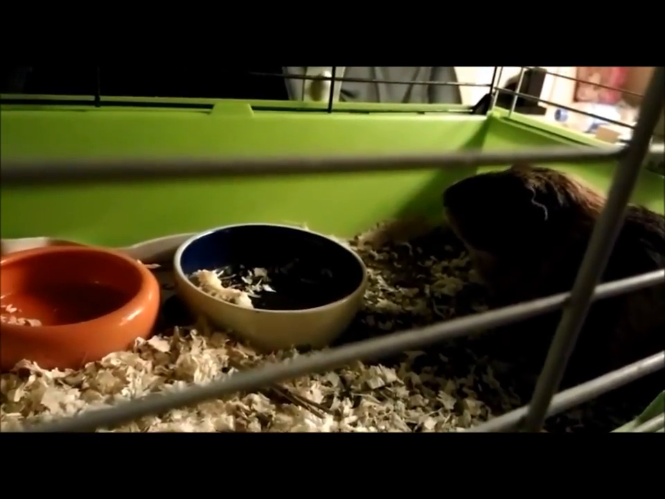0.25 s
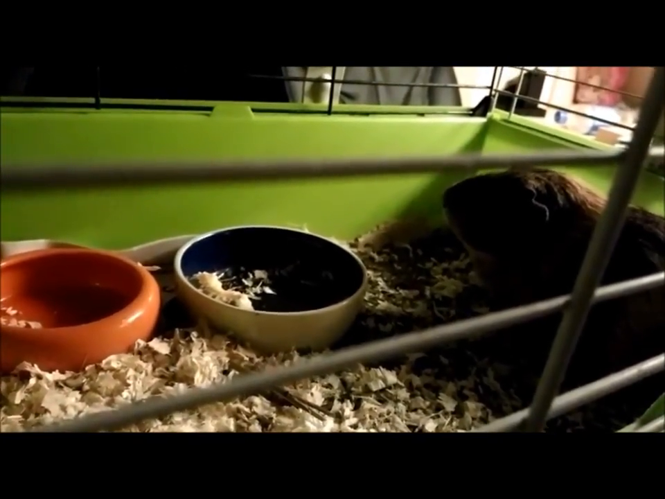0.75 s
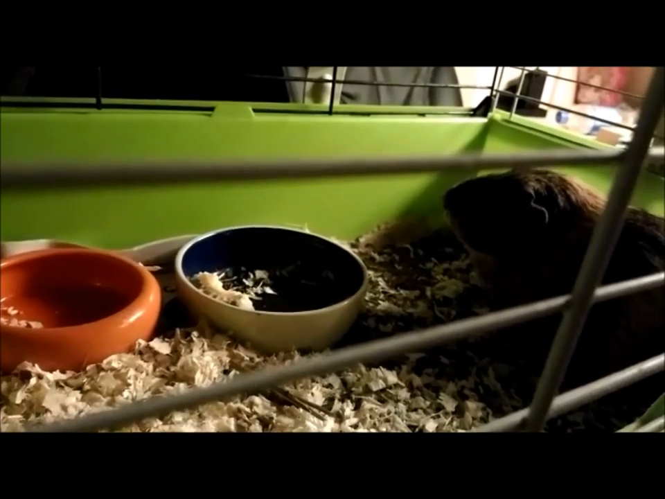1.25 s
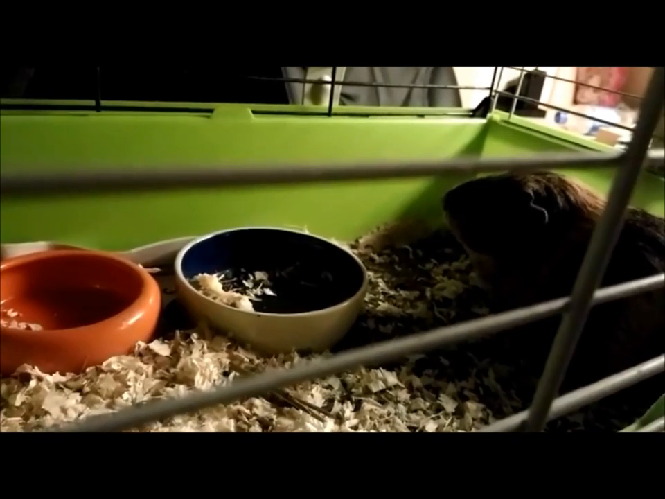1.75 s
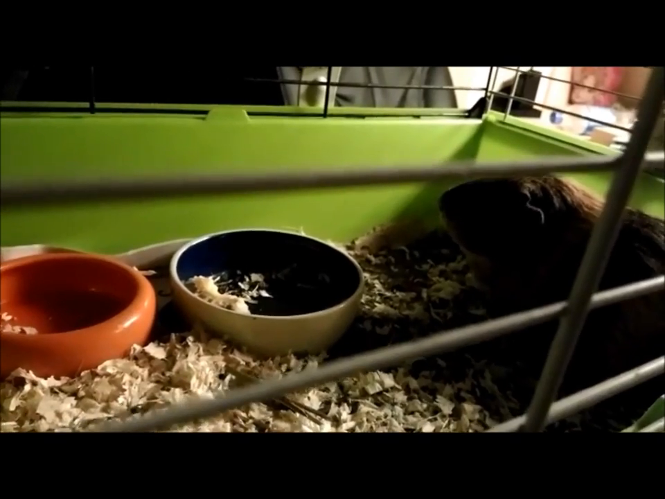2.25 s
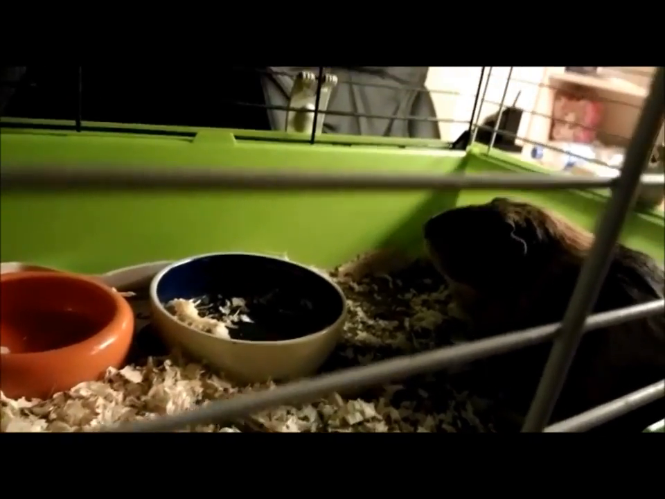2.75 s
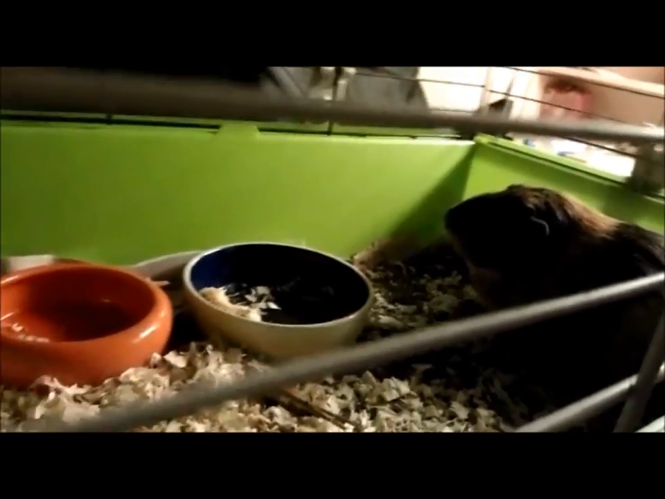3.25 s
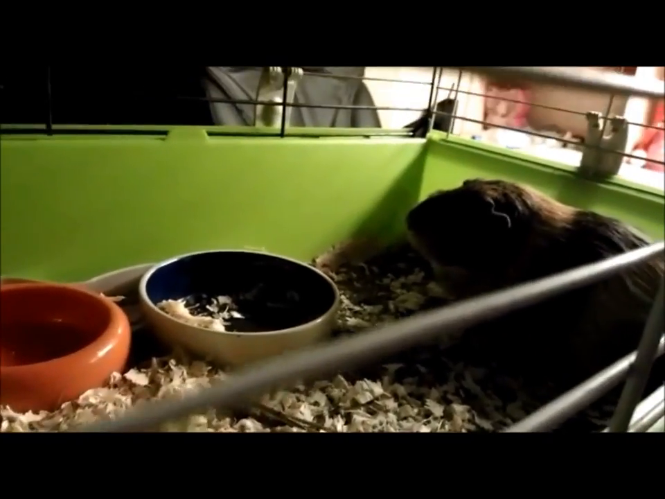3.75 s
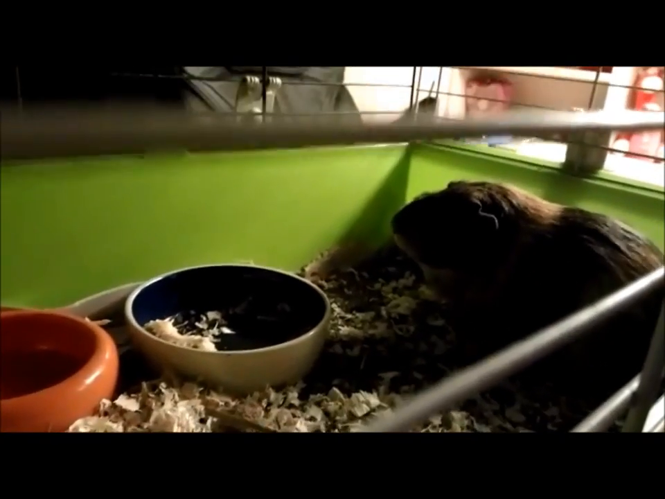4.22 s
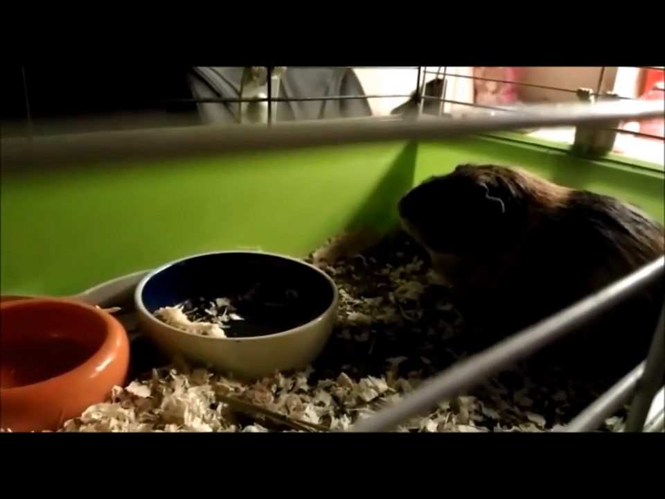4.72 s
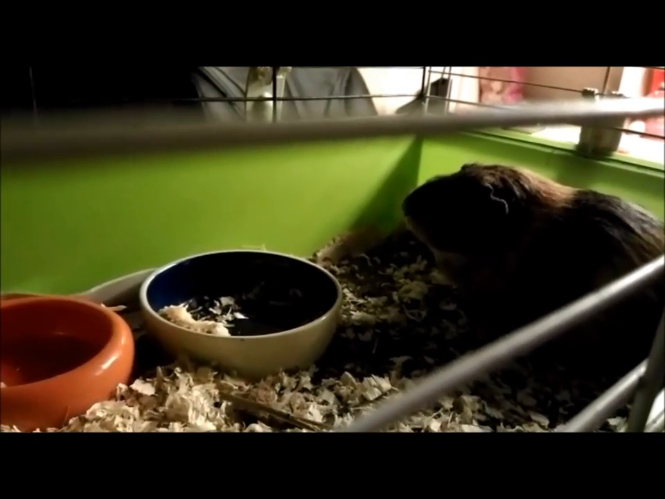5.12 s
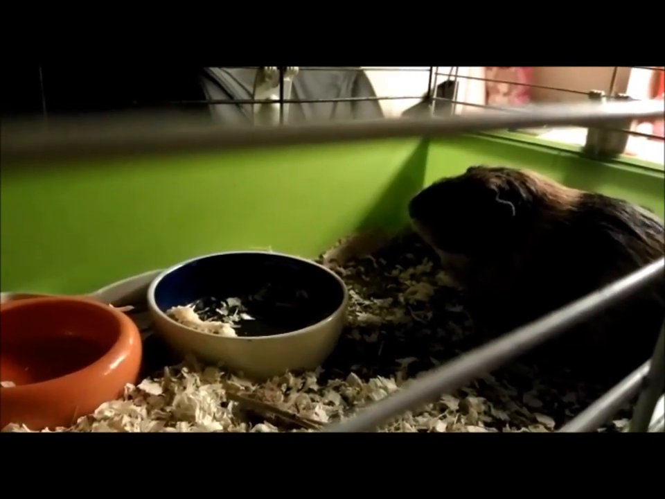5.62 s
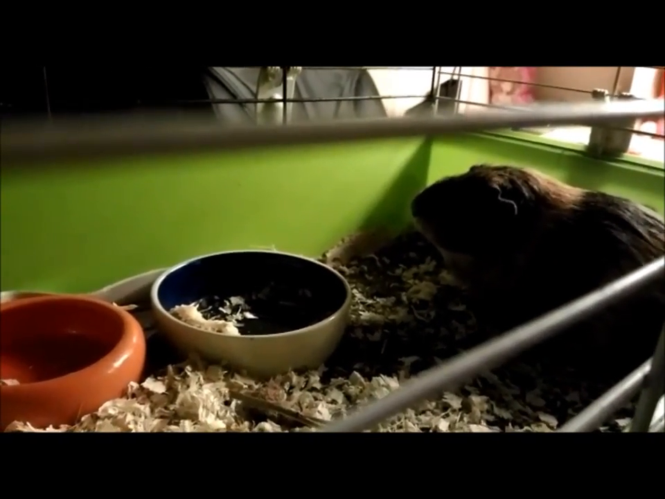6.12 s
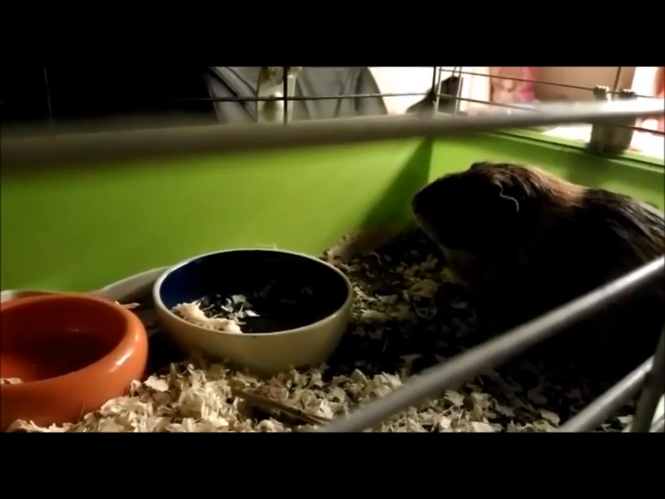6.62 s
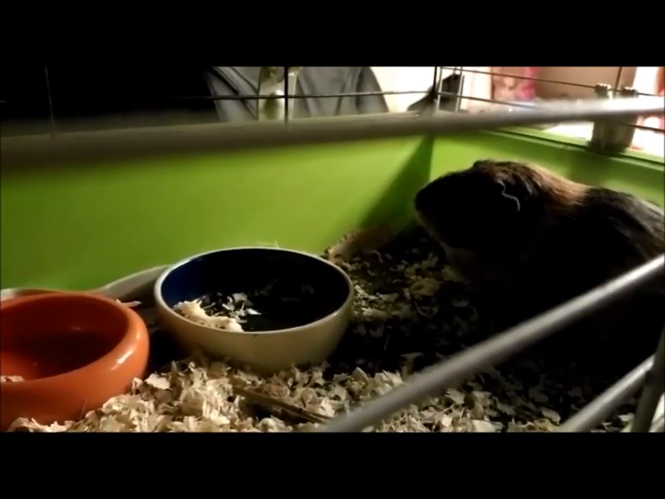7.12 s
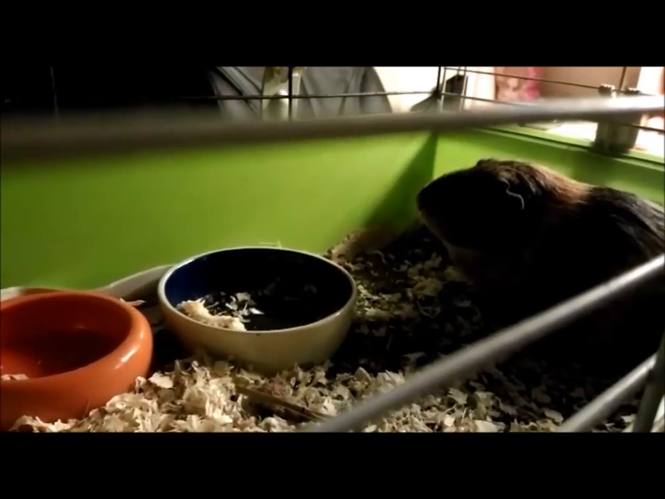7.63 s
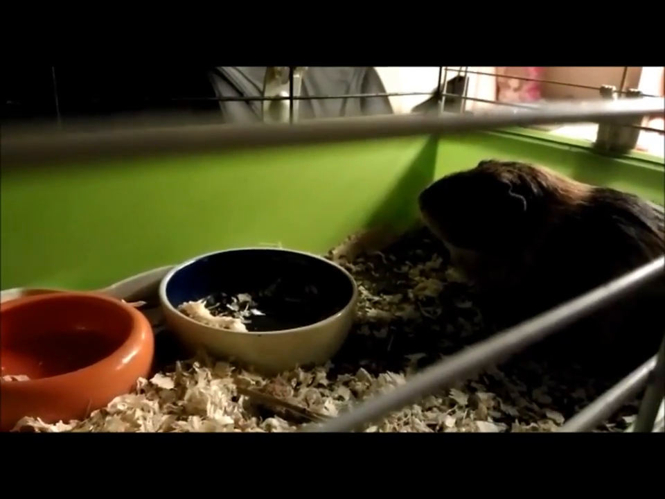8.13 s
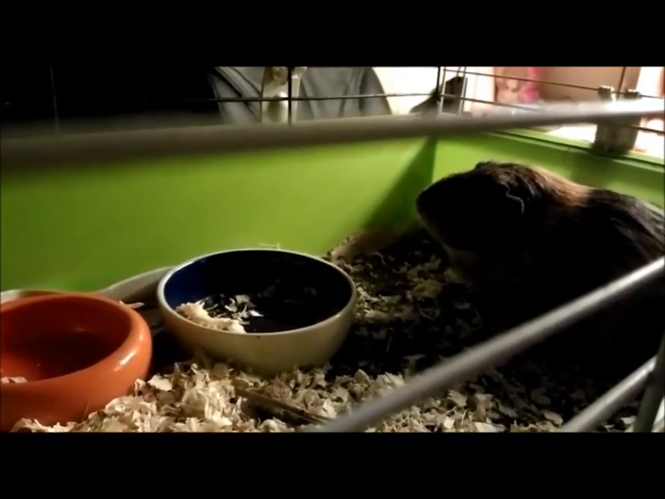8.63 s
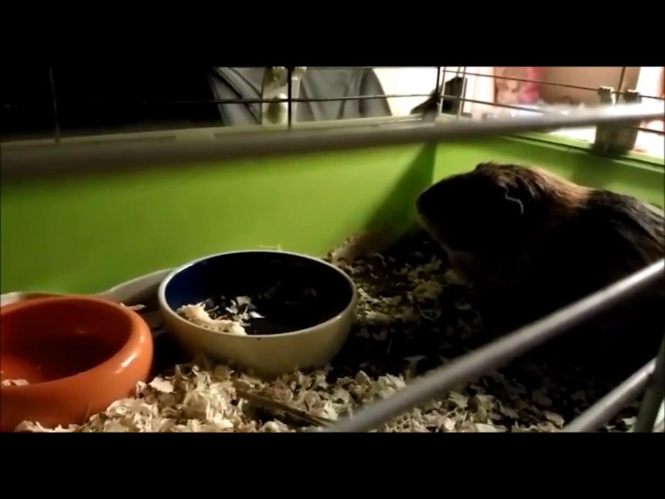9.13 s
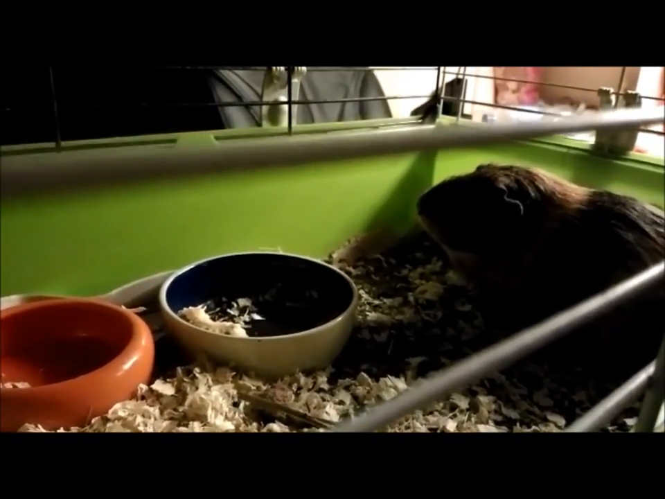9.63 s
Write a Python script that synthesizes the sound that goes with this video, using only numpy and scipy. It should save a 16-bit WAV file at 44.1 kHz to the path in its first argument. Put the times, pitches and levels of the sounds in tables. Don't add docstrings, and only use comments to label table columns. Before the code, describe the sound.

Close indoor sound of one small pet squeaking in two long, regular runs. The squeaks are very short, high and bright, dropping in pitch, with a short ringing reflection from cage and walls. Between runs come crisp cracks, light rustling, faint sniffs and broken calls. The second run is quieter, with one odd rising, cracking squeak. Low hush, a weak uneven hum and soft handling thumps lie underneath.

```python
import sys
import numpy as np
from scipy import signal
from scipy.fft import rfft, irfft, next_fast_len
from scipy.io import wavfile
from scipy.ndimage import uniform_filter1d, map_coordinates

SR = 44100
rng = np.random.default_rng(int(sys.argv[2]) if len(sys.argv) > 2 else 0)


def master(y):
    cut = np.clip(np.atleast_2d(y).T, -1, 1)
    pcm = np.round(cut * 32767)
    wavfile.write(sys.argv[1], SR, pcm.astype(np.int16))


def how_loud(loudness_db):
    steps = np.asarray(loudness_db, float) / 20
    return 10 ** steps


N = 435266

# start_s, length_s, top_pitch_hz, last_pitch_hz, level_db
FIRST_RUN = [(-0.022, 0.055, 3640, 2980, -32), (0.209, 0.05, 3580, 2897, -30),
             (0.431, 0.054, 3596, 2890, -30.5), (0.663, 0.055, 3603, 3080, -31.5),
             (0.889, 0.055, 3584, 2924, -30.5), (1.129, 0.053, 3608, 2884, -30),
             (1.339, 0.057, 3581, 2970, -29.5), (1.586, 0.051, 3562, 2940, -29.5),
             (1.799, 0.061, 3543, 2733, -29.0), (2.06, 0.055, 3610, 2974, -31.5),
             (2.258, 0.063, 3603, 2940, -30.5), (2.491, 0.056, 3565, 2907, -30.5),
             (2.709, 0.058, 3592, 2926, -30.0), (2.924, 0.053, 3618, 3130, -32)]
SECOND_RUN = [(4.845, 0.052, 3736, 2937, -37), (5.045, 0.06, 3729, 2880, -34.0),
              (5.287, 0.062, 3698, 2860, -35), (5.497, 0.061, 3734, 2876, -34.5),
              (5.744, 0.052, 3704, 2923, -35.5), (5.955, 0.06, 3690, 2880, -33.5),
              (6.447, 0.052, 3700, 2860, -34), (6.66, 0.057, 3652, 3106, -34),
              (6.899, 0.053, 3617, 2663, -33), (7.107, 0.06, 3619, 2990, -34.0),
              (7.339, 0.059, 3623, 2784, -33.5), (7.543, 0.062, 3635, 2896, -32.5),
              (7.802, 0.056, 3627, 2820, -34), (8.001, 0.06, 3610, 2986, -33.5),
              (8.291, 0.058, 3600, 2814, -33.5), (8.515, 0.061, 3554, 2880, -33),
              (8.762, 0.057, 3635, 2876, -34.5), (8.959, 0.058, 3627, 3077, -33),
              (9.252, 0.051, 3634, 2770, -33), (9.449, 0.058, 3604, 2960, -30.5),
              (9.709, 0.056, 3623, 2925, -33.5)]
# freq_hz, level_db
HISS = [(4600, -27.5), (5300, -21.5), (7000, -14.5), (8200, -15), (9500, 3), (10600, -9.5), (12300, -4),
        (14000, -21)]


def unit(x):
    return x / np.sqrt(np.mean(x ** 2) + 1e-20)


def along(points, hz):
    f, v = np.transpose(points)
    return np.interp(np.log(hz + 1), np.log(f + 1), v)


def over_time(points):
    return np.interp(np.arange(N) / SR, *np.transpose(points))


def filtered(x, response):
    m = next_fast_len(len(x) + 8192)
    return irfft(rfft(x, m) * response(np.fft.rfftfreq(m, 1 / SR)), m)[:len(x)]


def coloured(x, spectrum):
    return filtered(x, lambda hz: how_loud(along(spectrum, hz)))


def noise(spectrum, size=N):
    return unit(coloured(rng.standard_normal(size), spectrum))


def wobble(rate, size=N):
    return map_coordinates(rng.standard_normal(int(size * rate / SR) + 4), [np.arange(size) * rate / SR])


def smooth(s, v, t):
    v = np.pad(v, (2, 2), mode="reflect", reflect_type="odd")
    return map_coordinates(v, [np.interp(t, s, np.arange(len(s))) + 2])


def add(track, s, sound):
    at = round(s * SR)
    part = track[max(at, 0):][:len(sound) + min(at, 0)]
    sound = sound[max(-at, 0):]
    part += sound[:len(part)]


def murmur():
    # time_s, level_db
    hush = [(0, -78.5), (1.2, -79), (2.901, -76.5), (3.2, -80.5), (3.499, -77.5), (3.749, -84.5),
            (4.28, -84.5), (4.34, -76.5), (4.6, -76), (4.7, -85.5), (4.879, -80.5), (5.029, -79),
            (9.87, -79)]
    # freq_hz, density_db_per_hz
    low_colour = [(15, -60.5), (25, -24.5), (155, -10.5), (194, -10), (369, -17), (568, -24), (700, -28.5),
                  (910, -53.5), (1540, -120)]
    air_colour = [(290, -19.5), (500, -5.5), (923, -7.5), (1090, -4.5), (1380, -7), (1850, -4.5),
                  (4000, -11.5), (7000, -24)]
    far_colour = [(1500, -20), (3000, -3.5), (7500, -1.5), (12200, 0), (14000, -2.5)]
    level_db = over_time(hush)
    low = how_loud(level_db - 1 + 2.1 * wobble(4.4)) * noise(low_colour)
    air = how_loud(level_db + 3 + 1.3 * wobble(9)) * noise(air_colour)
    return low + air + how_loud(-84) * noise(far_colour)


def drone():
    # time_s, level_db
    swell = [(0, -82.5), (3.5, -92), (4.7, -91), (4.95, -87), (7, -80.5), (9.87, -79.5)]
    hum = noise([(45, -31), (82, -8.5), (130, -22.5), (300, -80.0)])
    return how_loud(over_time(swell) + 1.8 * wobble(8.8)) * hum


def thumps(rise=.006, t60=.075):
    # time_s, peak_db, pitch_hz
    bumps = [(0.059, -65, 130), (0.427, -68, 134), (0.799, -73.5, 94.2), (2.522, -62.5, 114),
             (4.354, -76, 140), (4.569, -79.5, 159.5), (6.088, -69, 141), (6.819, -69, 113),
             (7.069, -76, 169), (7.525, -65.5, 113), (9.336, -70, 162)]
    out, t = np.zeros(N), np.arange(SR // 6) / SR
    for s, db, hz in bumps:
        swell = how_loud(db + 14.5 - 60 * t / t60) * (1 - np.exp(-t / rise))
        add(out, s, swell * np.sin(2 * np.pi * hz * t))
    return out


def ticks(lag=.001, t60=0.0046, clack_t60=0.0093):
    # time_s, treble_peak_db, middle_db, low_knock_db
    hits = [(2.028, -50, -86.5, -88), (2.793, -29, -63, -70), (2.812, -31.5, -57.5, -67),
            (2.8378, -25, -49.5, -44), (2.8996, -18, -39, -45.5), (2.9911, -25, -48.5, -47),
            (3.435, -48, -79, -85), (3.4647, -42.5, -67, -77), (3.49, -32.5, -69.5, -80),
            (3.5718, -50, -72, -70), (3.726, -65.5, -85, -73.5), (3.7991, -69.5, -83.5, -66),
            (3.8676, -57, -77, -76.5), (4.1151, -76.5, -80.5, -70), (4.1411, -63, -85, -79),
            (4.3344, -69, -76, -78.5), (4.3527, -36.5, -59.5, -72), (4.5507, -50.5, -67, -91),
            (4.571, -42.5, -56.5, -72), (4.8434, -42, -61, -83.5)]
    # freq_hz, level_db
    crack_colour = [(5000, -56), (7500, -6), (10500, 7.5), (14000, -15), (15500, 14), (16500, -34)]
    clack_colour = [(200, -0.5), (600, -7.5), (2000, -8.5), (4000, -6.5), (6000, -4), (9000, -13.5)]
    start_hz, end_hz, fall_s, knock_t60 = 300, 120, .01, .05
    cracks, clacks, knocks = np.zeros(N), np.zeros(N), np.zeros(N)
    t = np.arange(SR // 10) / SR
    knock_hz = end_hz + (start_hz - end_hz) * np.exp(-t / fall_s)
    knock = how_loud(-60 * t / knock_t60) * np.sin(2 * np.pi * np.cumsum(knock_hz) / SR)
    for s, db, clack_db, knock_db in hits:
        add(cracks, s + lag, how_loud(db - 0.5 - 60 * t / t60) * rng.standard_normal(len(t)))
        add(clacks, s + lag, how_loud(clack_db + 21.5 - 60 * t / clack_t60) * rng.standard_normal(len(t)))
        add(knocks, s + lag, how_loud(knock_db + 1.5) * knock)
    return coloured(cracks, crack_colour) + coloured(clacks, clack_colour) + knocks


def sniffs():
    # start_s, length_s, level_db
    breaths = [
        (2.761, 0.12, -66),
        (3.41, 0.17, -70),
        (3.53, .12, -71.5),
        (3.774, 0.085, -86.5),
        (4.009, .08, -92),
        (4.12, .12, -84),
        (4.5, .05, -76),
    ]
    flow = np.zeros(N)
    for s, length, db in breaths:
        add(flow, s, how_loud(db) * np.sqrt(np.hanning(round(length * SR))))
    grain = unit(how_loud(4 * wobble(220)))
    return flow * grain * noise([(5000, -22.0), (8000, -10), (10200, 0), (12000, 0.5), (14000, -6)])


def puffs(rise=0.0054, hiss_t60=0.042):
    # freq_hz, level_db
    puff_colour = [(90, -35), (280, 7), (900, -18), (1900, 6.5), (2600, 2.5), (4000, -20.5), (5200, -7.5),
                   (7500, -26.5)]
    # time_s, puff_db, hiss_db
    odd_shuts = [
        (3.3104, -76.5, -51),
        (4.4029, -53.5, -51),
        (4.612, -54, -58),
        (6.278, -54, -52.5),
    ]
    lead_s, puff_t60 = .034, .055
    shut_s, scatter_db = .01, 2.5
    dull, airy, t = np.zeros(N), np.zeros(N), np.arange(SR // 8) / SR
    shuts = []
    for s, length, *_ in FIRST_RUN + SECOND_RUN:
        puff_db, hiss_db = rng.normal((-53, -48.5), scatter_db)
        shuts.append((s + length + shut_s, puff_db, hiss_db))
    for s, puff_db, hiss_db in shuts + odd_shuts:
        add(dull, s - .003, how_loud(puff_db + 4.0 - 60 * t / puff_t60) * (1 - np.exp(-t / rise)))
        fade_db = -60 * np.clip(t - lead_s - .006, 0, 1) / hiss_t60
        add(airy, s - lead_s, how_loud(hiss_db + fade_db) * np.clip(t / lead_s, 0, 1) ** 2)
    return dull * noise(puff_colour) + airy * how_loud(3.5 * wobble(150)) * noise(HISS)


def contours():
    # time_s, pitch_hz, fundamental_db
    odd_calls = [
        [(3.26, 3510, -29), (3.27, 3690, -38), (3.279, 3524, -31.5), (3.288, 3405, -30.5), (3.296, 2940, -20.5),
         (3.305, 2809, -23), (3.314, 2380, -47)],
        [(3.536, 3190, -57), (3.541, 3410, -58.5), (3.547, 3430, -65.5)],
        [(4.356, 3500, -45.5), (4.366, 3503, -36.5), (4.374, 3065, -35), (4.382, 2773, -30.5),
         (4.39, 2643, -33), (4.398, 2590, -30)],
        [(4.577, 3270, -48), (4.584, 3364, -44.5), (4.591, 3250, -46.5), (4.598, 3120, -45.5)],
        [(6.204, 3520, -50.5), (6.219, 3638, -37), (6.232, 3557, -37), (6.246, 3196, -32), (6.259, 2560, -43),
         (6.272, 2405, -34)],
    ]
    peak_s, sag_bend = .014, 1.83
    swell_s, swell_db, fade_db = .03, 9.5, 0.5
    for s, length, top_hz, last_hz, db in FIRST_RUN + SECOND_RUN:
        t = np.arange(0, length, 1 / SR)
        sag = np.abs((t - peak_s) / (length - peak_s)) ** sag_bend
        level_db = db - swell_db * np.clip(1 - t / swell_s, 0, 1) - fade_db * sag
        yield s, t, top_hz - (top_hz - last_hz) * sag, level_db
    for rows in odd_calls:
        s, hz, db = np.transpose(rows).astype(float)
        t = np.arange(s[0], s[-1], 1 / SR)
        yield s[0], t - s[0], smooth(s, hz, t), smooth(s, db, t)


def chirps(breath_db=-31, breath_lag=0.004):
    # pitch_hz, second_db, third_db, fourth_db
    mouth = [(2550, -42, -46, -50), (2780, -11, -19, -42), (2950, -36, -26, -42), (3200, -13, -15, -30),
             (3400, -12, -3, -11), (3560, -6.5, 9, -10), (3640, -3, 3, -25), (3720, -1.5, -0.5, -33.5)]
    # time_s, second_db, third_db, fourth_db, leaking_air_db
    head_turns = [(0, 7, 4.5, -1.5, 2.5), (1.5, 7, 3.5, -0.5, 4), (2.302, 7.5, 5.5, 0.5, 2.5),
                  (3, 6, 2.5, 1, 2.5), (3.268, 0.5, -2, -3, -6), (4.37, -9, -5, -17, 3),
                  (4.58, -11.5, 10.5, -22, 1), (4.86, 4.5, 3, -4.5, 8), (5.5, 5, 3.5, 3, 9.5),
                  (7.501, 5.5, 2, 4, 7), (9.8, 4.5, -0.5, 4, 4.5)]
    # freq_hz, level_db
    corner_tone = [(2600, 2), (3000, -0.5), (3250, -0.5), (3390, 4), (3455, -2.5), (3520, 2.5), (3600, 0),
                   (3700, 5)]
    # freq_hz, level_db
    leak_colour = [(300, -14), (1900, -6), (3200, -6), (4300, -14), (5400, 0), (7500, -8)]
    attack_s, release_s, waver = .007, .007, .0018
    open_db, open_s = 6, .016
    span = round(.003 * SR)
    voice, effort = np.zeros(N), np.zeros(N)
    mouth_hz, *overtone_db = np.transpose(mouth)
    turn_s, *facing_db = np.transpose(head_turns)
    for s, t, pitch, db in contours():
        pitch = pitch * (1 + waver * wobble(350, size=len(t)))
        phase = 2 * np.pi * np.cumsum(pitch) / SR
        ramp = np.clip(np.minimum(t / attack_s, (t[-1] - t) / release_s), 0, 1)
        edges = np.sin(np.pi / 2 * ramp) ** 2
        level = edges * how_loud(db)
        facing = [how_loud(np.interp(s, turn_s, turn_db)) for turn_db in facing_db]
        corner = how_loud(uniform_filter1d(along(corner_tone, pitch), span // 2))
        overtones = 0
        for k, favour_db in enumerate(overtone_db):
            shape_db = uniform_filter1d(np.interp(pitch, mouth_hz, favour_db), span)
            shape_db = uniform_filter1d(shape_db, span) + 0.97 * wobble(100, size=len(t))
            overtones = overtones + facing[k] * how_loud(shape_db) * np.sin((k + 2) * phase)
        opening = edges * how_loud(-open_db * np.clip(1 - t / open_s, 0, 1))
        add(voice, s, np.sqrt(2) * level * (corner * np.sin(phase) + opening * overtones))
        add(effort, s + breath_lag, facing[3] * level)
    return voice + effort * (how_loud(breath_db) * noise(HISS) + how_loud(-39.5) * noise(leak_colour))


def walls(x, gap=0.004, onset=0.0015):
    # freq_hz, t60_s
    decay = [(200, 0.12), (2700, 0.23), (3500, 0.23), (5500, 0.35), (7000, 0.22), (10500, 0.23),
             (14000, 0.14)]
    # freq_hz, level_db
    echo_colour = [(2800, -1), (3500, 2.5), (7000, 3), (10500, -5), (14000, 4.5)]
    late_db, late_stretch = -21, 1.6
    hz, t, z = signal.stft(rng.standard_normal(SR // 2), SR, nperseg=256)
    fall_db = -60 * t / along(decay, hz)[:, None]
    fall = how_loud(fall_db) + how_loud(late_db + fall_db / late_stretch)
    tail = signal.istft(z * how_loud(along(echo_colour, hz)[:, None]) * fall, SR, nperseg=256)[1]
    tail = tail * (1 - np.exp(-np.clip(np.arange(len(tail)) / SR - gap, 0, 1) / onset))
    return signal.fftconvolve(x, tail / np.linalg.norm(tail))[:N]


def scene():
    # time_s, level_db
    echo_send = [(0, -12), (3.1, -11), (3.25, -9.5), (4.8, -7.5), (5, -9), (9.87, -8.5)]
    animal = chirps() + puffs() + sniffs()
    clicks = ticks()
    echoes = walls(how_loud(over_time(echo_send)) * animal + how_loud(-29.5) * clicks)
    return (animal + clicks + echoes + thumps() + murmur() + drone())[None]


def top_cut(x):
    return signal.sosfilt(signal.butter(12, 15690, fs=SR, output="sos"), x)


def record(dry):
    # freq_hz, level_db
    mirror_colour = [(3000, -30), (5300, -9), (6300, 4), (7000, -5), (8800, 7), (12500, -14)]
    mirror_hz, top_hz = 16000, 14300
    mirror = dry[0] * np.cos(2 * np.pi * mirror_hz * np.arange(N) / SR)
    x = dry[0] + how_loud(-30) * coloured(mirror, mirror_colour)
    x = filtered(x, lambda hz: how_loud(-50) + 1 / (1 + (hz / top_hz) ** 200))
    x = filtered(x, lambda hz: 1 / (1 + (40 / (hz + 1)) ** 2))
    return top_cut(x[None])


dry = scene()
out = record(dry)
master(out)
```